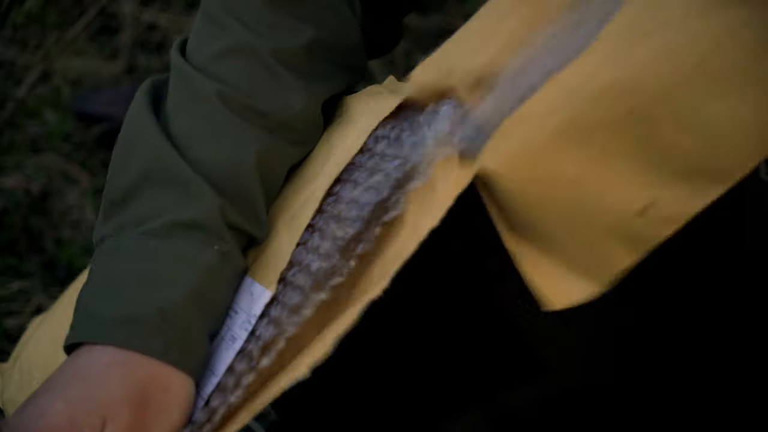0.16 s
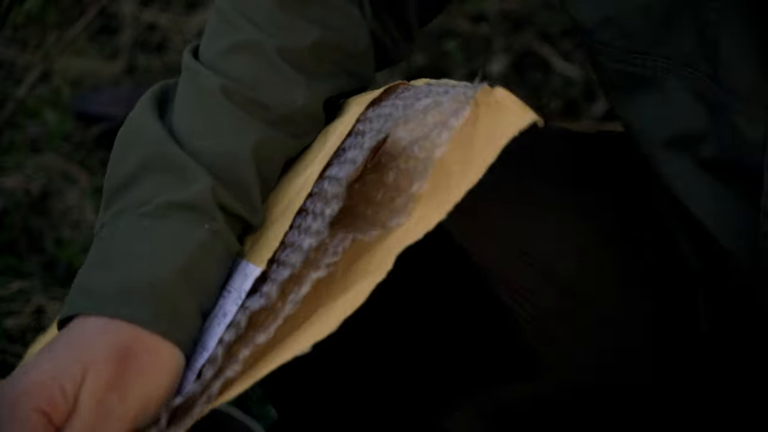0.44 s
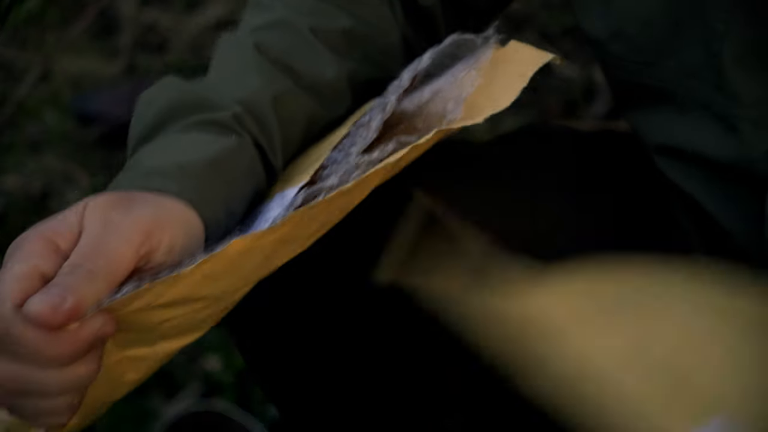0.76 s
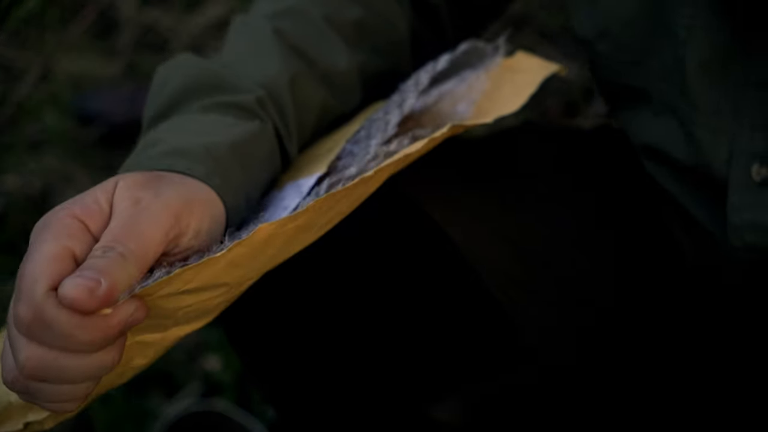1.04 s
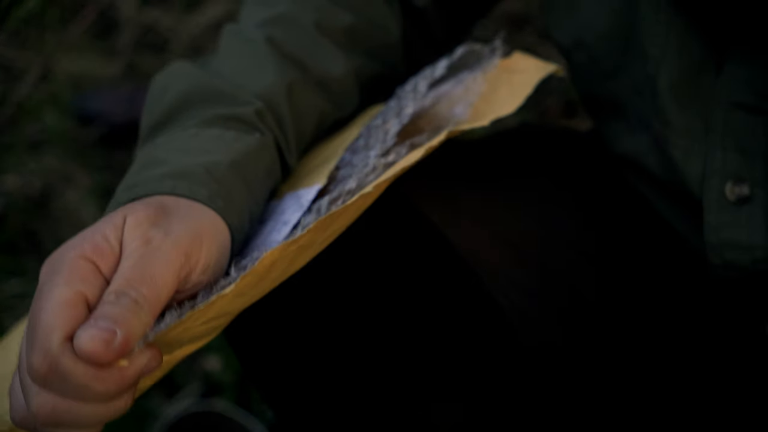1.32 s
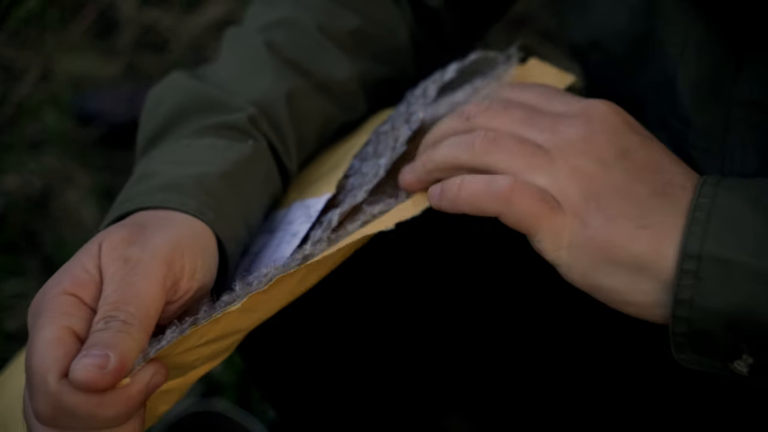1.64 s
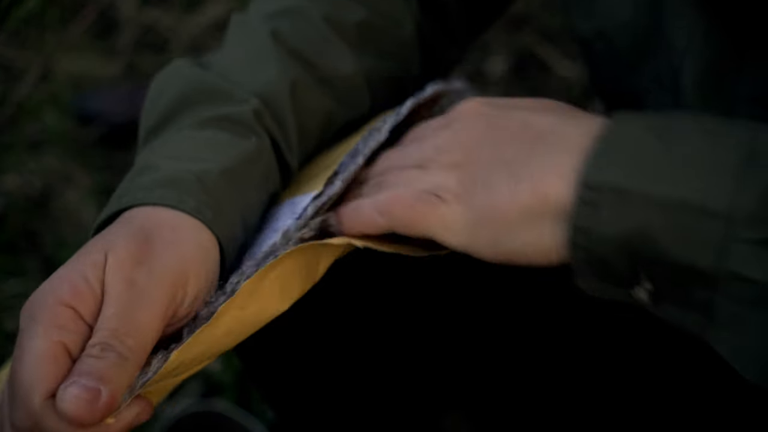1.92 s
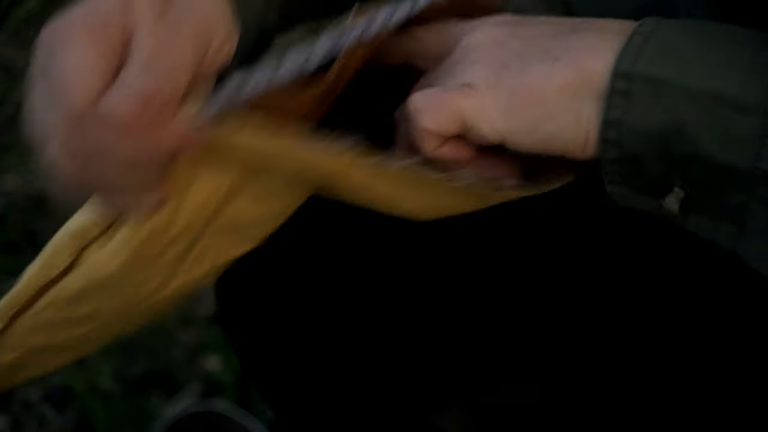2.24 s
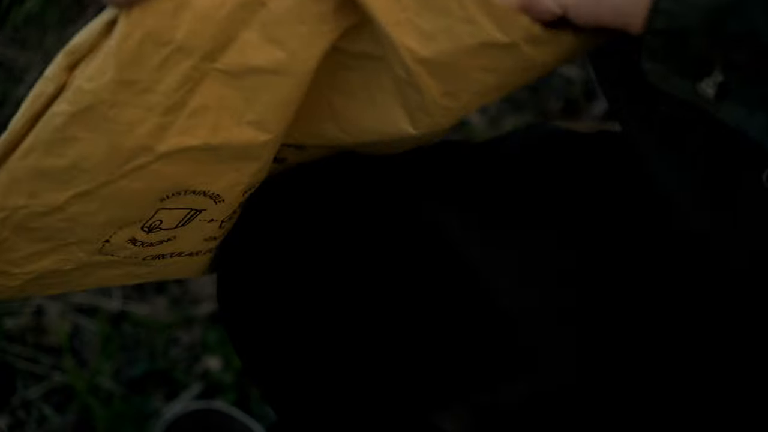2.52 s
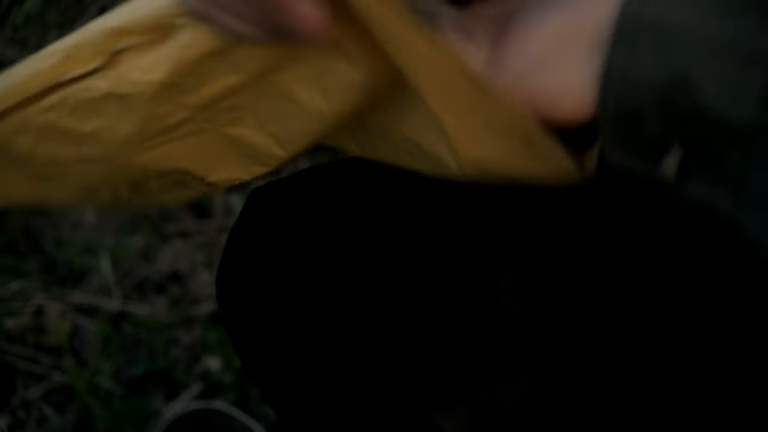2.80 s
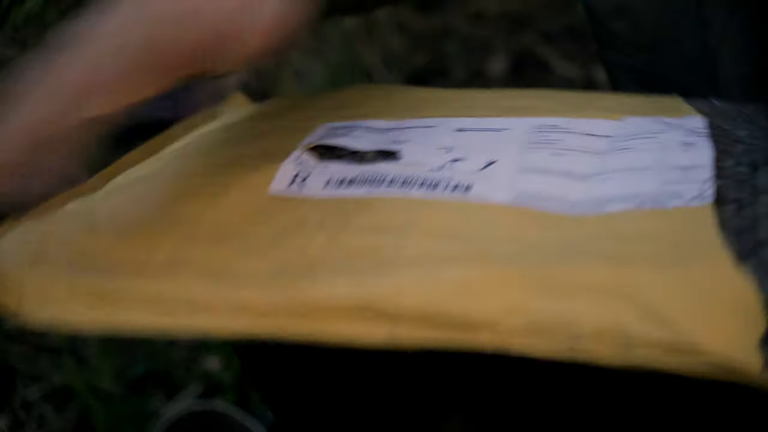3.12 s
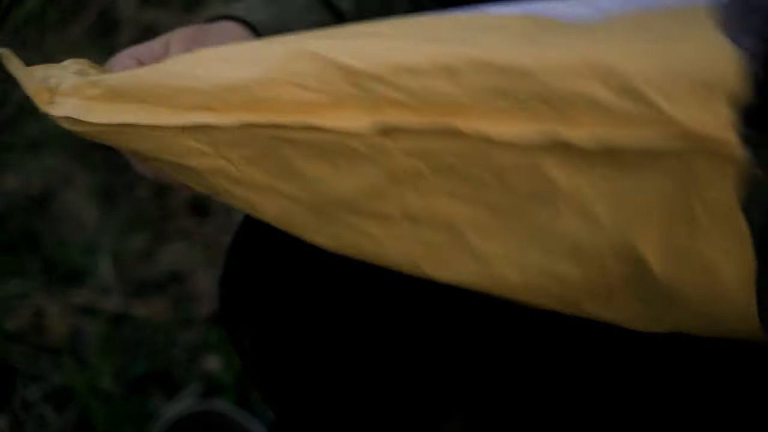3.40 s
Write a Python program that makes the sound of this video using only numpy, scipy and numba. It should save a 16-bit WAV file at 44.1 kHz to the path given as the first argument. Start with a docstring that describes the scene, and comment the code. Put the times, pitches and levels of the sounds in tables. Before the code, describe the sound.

A padded paper envelope is ripped open, then crinkles as it is handled.

```python
"""A padded paper envelope is torn open close by, over a faint outdoor background.
First the fibres part in a dense run of tiny snaps, until the strip comes free with a flap of the sheet.
Then, from about half a second, the envelope is held nearly still and only rustles a little.
From about two seconds a hand opens it, reaches in and turns it over: creases buckle one by one,
the paper crinkles and slides, and the hollow envelope thumps softly."""
import sys
import numpy as np
from scipy import signal
from scipy.fft import rfft, irfft
from scipy.io import wavfile
from scipy.ndimage import uniform_filter1d
from numba import njit

SR = 44100
rng = np.random.default_rng(int(sys.argv[2]) if len(sys.argv) > 2 else 0)


def inscribe(sig):
    """Save sig as 16-bit PCM at rate SR to the path in sys.argv[1].

    A 1-D sig is mono; a 2-D sig holds one channel per row.
    Samples are clipped to [-1, 1] before scaling.
    """
    pcm = np.round(np.clip(np.atleast_2d(sig).T, -1, 1) * 32767)
    wavfile.write(sys.argv[1], SR, pcm.astype(np.int16))


N = 156555
MIDDLE_HZ, TREBLE_HZ, TOP_HZ = 500, 3300, 15400
RING_SLOPE = 0.3  # how much sooner high-pitched spots of paper stop ringing


def undb(db):
    """Turn decibels into a gain."""
    return 10 ** (np.asarray(db) / 20)


def unit(x):
    """Scale a sound to an average (rms) level of 1."""
    return x / np.sqrt(np.mean(x ** 2) + 1e-20)


def band(x, edges, kind, order=2):
    """Keep only the low, high or in-between frequencies."""
    return signal.sosfilt(signal.butter(order, edges, kind, fs=SR, output="sos"), x)


def response(points):
    """Build a short click (an impulse response) whose tone follows (frequency_hz, level_db) points."""
    hz, db = np.array(points, float).T
    grid_hz = np.maximum(np.fft.rfftfreq(4096, 1 / SR), 1)
    gain = undb(np.interp(np.log(grid_hz), np.log(np.sort(hz)), db))
    cepstrum = irfft(np.log(gain))
    half = len(cepstrum) // 2
    fold = np.r_[1, np.full(half - 1, 2), 1, np.zeros(half - 1)]  # moves the energy to the click's start
    return irfft(np.exp(rfft(cepstrum * fold)))[:half]


def colour(x, taps):
    """Give a sound the tone of an impulse response."""
    return signal.fftconvolve(x, taps)[:len(x)]


def add(out, start_s, sound):
    """Mix a short sound in at a given time."""
    i = max(int(start_s * SR), 0)
    out[i:i + len(sound)] += sound[:max(N - i, 0)]


def outdoor_air():
    """A faint, steady, low rush of outdoor noise."""
    # tone of the background: frequency_hz, level_db
    air_tone = [(30, -29.5), (70, -4.5), (340, 1), (600, -7), (1500, -10), (4000, -27.5), (15000, -39)]
    return undb(-58.5) * unit(colour(rng.standard_normal(N), response(air_tone)))


def sheet_flaps():
    """Flapped or bumped, the padded sheet swings for a few cycles and gives a soft thump."""
    # each flap or bump: start_s, level_db, pitch_hz
    flaps = [(0.466, -14, 288), (0.54, -13, 162), (0.9725, -38, 310), (1.698, -33.5, 240),
             (1.792, -28, 397), (2.334, -25, 172), (2.383, -21, 266), (2.556, -23.5, 279),
             (2.833, -33, 202), (3.02, -27, 165), (3.051, -17.5, 335), (3.414, -18, 406)]
    # the ways the sheet vibrates: pitch_ratio, level_db
    modes = [(.66, -9.5), (1.02, 1), (1.88, -3.5), (2.35, -9), (3.2, -7.5), (4.6, -2.5)]
    fade_cycles, rise_s = 1.44, 0.0018
    out, t = np.zeros(N), np.arange(4096) / SR
    for start_s, level_db, pitch_hz in flaps:
        swing = np.zeros(len(t))
        for ratio, mode_db in modes:
            fade = np.exp(-t * pitch_hz * np.sqrt(ratio) / fade_cycles)
            swing += undb(mode_db) * np.sin(2 * np.pi * pitch_hz * ratio * t) * fade
        add(out, start_s, undb(level_db) * swing * (1 - np.exp(-t / rise_s)))
    return out


def crease_snaps():
    """A crease gives way: a crack spreads, the paper beside it rings, and the sheet answers low."""
    # each snapping crease: start_s, relative_level_db, pitch_hz, brightness_db_per_octave
    snaps = [(0.0756, -21, 2670, -0.5), (0.107, -17.5, 6140, -0.5), (0.114, -18, 5700, -2.5),
             (0.2013, -23, 6250, 6), (0.335, -19, 3470, 1), (0.3493, -17.5, 2730, -1),
             (0.3766, -22, 2200, 3.5), (0.463, -20.5, 2140, -1.5), (0.5016, -25.5, 1720, -7),
             (0.5182, -30.5, 1930, -8), (0.5396, -26.5, 795, -9), (0.6136, -35.5, 2660, -2.5),
             (0.6404, -30, 1004, -4.5), (0.825, -38.5, 1420, -1.5), (0.9747, -31.5, 3580, -4),
             (0.9794, -35.5, 1350, -3), (1.073, -38.5, 1230, -10), (1.0923, -44, 1420, -4),
             (0.8521, -41.5, 2130, 2.5), (1.7818, -38, 6640, 0.5), (1.8055, -37.5, 3100, 3),
             (1.8161, -34.5, 6600, -2), (1.8733, -32, 3000, 0.5), (1.9135, -40, 2600, -3),
             (1.9465, -32, 2590, -3.5), (1.9708, -27, 820, 1), (2.0425, -26.5, 1640, -3),
             (2.0811, -28.5, 2940, 4), (2.091, -31, 2720, -3.5), (2.114, -26.5, 1500, 6.5),
             (2.1422, -21, 2580, 4), (2.156, -22, 6900, 0.5), (2.1645, -23, 3700, 5),
             (2.1829, -23.5, 2700, -0.5), (2.2459, -21.5, 3880, -1.5), (2.3638, -29.5, 3670, 1),
             (2.4183, -21.5, 4960, 2), (2.5874, -29, 3360, -1.5), (2.63, -35, 1580, -5.5),
             (2.7928, -32, 4800, 1), (2.809, -22, 1780, 1.5), (2.8453, -20, 6220, 5),
             (2.9017, -28, 2540, 2), (2.9147, -23.5, 6070, 5), (2.922, -17, 3020, 1),
             (2.9623, -19.5, 3070, 2), (2.9897, -18, 3570, 0), (2.998, -23, 1620, -1),
             (3.0467, -18, 3260, 1.5), (3.0551, -19, 3460, 3), (3.0759, -20, 4970, 1),
             (3.1239, -14.5, 6850, 4), (3.1623, -23.5, 1520, 0.5), (3.2454, -25.5, 2300, -1.5),
             (3.2633, -26.5, 1550, -4.5), (3.3451, -25, 2500, -1), (3.4132, -19, 750, -4),
             (3.4601, -17.5, 1520, -5.5), (3.4702, -20.5, 776, 1), (3.4862, -17, 1050, -2),
             (3.5234, -22.5, 2160, -1)]
    # tone of a crack before its brightness tilts it: frequency_hz, level_db
    crack_tone = [(100, -8.5), (500, -1.5), (1500, 1.5), (4000, 0.5), (6700, -1.5), (8500, -10.5),
                  (11000, -22.5), (15500, -52)]
    centre_hz = 3000
    out, t = np.zeros(N), np.arange(2048) / SR
    burst = lambda peak_s: t / peak_s * np.exp(-.5 * (t / peak_s) ** 2)
    fade = lambda decay_s: np.minimum(t / .0007, 1) * np.exp(-t / decay_s)
    gain = np.sqrt(.005 / t[-1])  # a snap holds the energy of about 5 ms at its level
    for start_s, level_db, pitch_hz, brightness in snaps:
        taps = response([(hz, db + brightness * np.log2(max(hz, MIDDLE_HZ) / centre_hz))
                         for hz, db in crack_tone])
        noise = rng.standard_normal((3, len(t)))
        crack = unit(colour(noise[0] * burst(peak_s=0.001), taps))
        spread = unit(colour(noise[1] * fade(decay_s=0.003), taps))
        ring_peak_s = 0.0014 * (pitch_hz / centre_hz) ** -RING_SLOPE
        ring = unit(np.sin(2 * np.pi * pitch_hz * t) * burst(ring_peak_s))
        body = unit(band(noise[2] * fade(decay_s=0.008), (155, 1010), "band"))
        body_db = -10.5 - 0.51 * brightness  # dull snaps have more body
        snap = undb(-2.5) * crack + undb(-9.5) * spread + undb(-5.5) * ring + undb(body_db) * body
        add(out, start_s, snap * undb(level_db) * gain)
    return out


@njit
def ringing_spots(start_s, pitch_hz, decay_s, size, length):
    """Each jolted spot of paper rings as one quickly fading sine wave."""
    out = np.zeros(length)
    for k in range(len(start_s)):
        wave = size[k] + 0j
        step = np.exp((2j * np.pi * pitch_hz[k] - 1 / decay_s[k]) / SR)  # turns and shrinks the wave
        first = int(start_s[k] * SR)
        for i in range(first, min(first + int(6 * decay_s[k] * SR), length)):
            wave *= step
            out[i] += wave.imag
    return out


def crackle(start_s, end_s, per_second, spread_db, spots=8):
    """Tiny buckles at random moments, mostly weak, a few strong; each rings several spots of paper."""
    span_s = end_s - start_s
    buckle_rng = np.random.default_rng(rng.integers(2 ** 31))
    draws = buckle_rng.random((int(span_s * per_second) + 1, 2 + 3 * spots))  # one row per buckle
    when, weakness = draws[:, :1], draws[:, 1:2]
    place, side, lag = np.hsplit(draws[:, 2:], 3)
    pitch_hz = 90 + TOP_HZ * place ** 2
    decay_s = 0.002 * (pitch_hz / 1000) ** -RING_SLOPE
    balance = np.sqrt(np.sqrt(pitch_hz) / decay_s)  # evens out the energy from low to high
    size = undb(-spread_db * np.log(.04 + weakness)) * np.sign(side - .5) * balance
    onset_s = start_s + when * span_s + lag * .0015  # a buckle reaches all its spots within 1.5 ms
    rings = ringing_spots(onset_s.ravel(), pitch_hz.ravel(), decay_s.ravel(), size.ravel(), N)
    return unit(rings) * np.sqrt(span_s * SR / N)


def paper(levels, tone, per_second, spread_db, rub_db, middle_offset_db, treble_offset_db):
    """Paper crackles and rubs; middle and treble each follow their own level curve plus an offset."""
    times, middle_db, treble_db = np.array(levels, float).T
    t = np.arange(N) / SR
    active = (t >= times[0]) & (t <= times[-1])
    buckles = crackle(times[0], times[-1], per_second, spread_db)
    rubbing = undb(rub_db) * rng.standard_normal(N)
    sound = colour(buckles + rubbing, response(tone))
    low = signal.sosfiltfilt(signal.butter(4, TREBLE_HZ, fs=SR, output="sos"), sound)
    high = sound - low
    middle = band(low, MIDDLE_HZ, "high", order=4)  # the bass rises and falls with the middle
    low *= undb(np.interp(t, times, middle_db) + middle_offset_db) / middle[active].std()
    high *= undb(np.interp(t, times, treble_db) + treble_offset_db) / high[active].std()
    soft_gate = uniform_filter1d(active * 1., size=200)
    return (low + high) * soft_gate


def holding():
    """Held nearly still, the envelope rubs quietly and crackles a little."""
    # loudness of the rustle: time_s, middle_db, treble_db
    hold_levels = [(0.48, -39.5, -48), (0.505, -41, -51), (0.55, -37.5, -37.5), (0.57, -49.5, -52.5),
                   (0.63, -43, -48), (0.745, -47.5, -48), (0.775, -50.5, -54), (1.055, -54, -59.5),
                   (1.085, -51, -54), (1.14, -53.5, -59.5), (1.39, -67, -71), (1.415, -46.5, -54.5),
                   (1.5, -58.5, -63.5), (1.675, -61.5, -64), (1.695, -48, -47), (1.755, -63, -54.5),
                   (1.79, -45.5, -45), (1.85, -60, -47.5), (1.93, -51, -48.5)]
    # tone of the held paper: frequency_hz, level_db
    hold_tone = [(35, -38), (64, -6), (117, -10), (202, -9.5), (577, -4), (1310, -8), (6320, -4.5),
                 (15500, -34)]
    return paper(hold_levels, hold_tone, per_second=290, spread_db=3.5, rub_db=1.5,
                 middle_offset_db=-1.5, treble_offset_db=-3.0)


def turning_over():
    """The paper crinkles and slides as a hand opens the envelope and turns it over."""
    # loudness of the handling: time_s, middle_db, treble_db
    turn_levels = [(1.93, -55, -49), (1.985, -45.5, -39.5), (2.025, -32.5, -30), (2.065, -46, -46.5),
                   (2.125, -45, -46.5), (2.15, -31, -34), (2.22, -37, -38.5), (2.28, -43.5, -36.5),
                   (2.305, -30.5, -30.5), (2.335, -24, -26.5), (2.36, -42.5, -46.5), (2.385, -32.5, -33),
                   (2.465, -43.5, -46), (2.487, -36.5, -27.5), (2.565, -41.5, -43.5), (2.615, -49, -54.5),
                   (2.665, -47, -41.5), (2.8, -50, -50), (2.828, -29.5, -31.5), (2.905, -38, -33.5),
                   (2.98, -27.5, -27.5), (3.04, -29.5, -31.5), (3.11, -33, -35.5), (3.15, -32, -32),
                   (3.23, -38, -44), (3.31, -37, -47.5), (3.4, -31.5, -36.5), (3.435, -22, -28.5),
                   (3.505, -27.5, -37.5), (3.55, -30.5, -35)]
    # tone of the crinkling paper: frequency_hz, level_db
    turn_tone = [(35, -39), (75, -19.5), (154, -5), (235, -6.5), (410, 2), (1250, -5.5), (1520, -2),
                 (2160, -6.5), (3390, -2.5), (7100, -2), (13000, -28.5), (15500, -51)]
    return paper(turn_levels, turn_tone, per_second=520, spread_db=2.0, rub_db=-4.0,
                 middle_offset_db=0.5, treble_offset_db=-1.5)


def tearing():
    """Fibres part in a dense run of tiny snaps as the strip is torn off."""
    # loudness of the rip: time_s, middle_db, treble_db
    tear_levels = [(0, -24, -31), (0.11, -23.5, -21.5), (0.145, -25, -28.5), (0.235, -22, -29),
                   (0.28, -25.5, -22), (0.37, -29, -33.5), (0.462, -33.5, -34.5), (0.478, -33, -49)]
    # tone of the tearing paper: frequency_hz, level_db
    tear_tone = [(35, -36), (75, -7.5), (174, -2), (740, -1.5), (1130, -4.5), (1520, -2), (2450, -7.5),
                 (2840, -5.5), (6160, -5.5), (9180, -18), (15500, -47.5)]
    return paper(tear_levels, tear_tone, per_second=1600, spread_db=2.5, rub_db=-8,
                 middle_offset_db=-0.7, treble_offset_db=-0.47)


def scene():
    """The rip, the lull and the handling, with snaps, flaps and the background, in one channel."""
    return (tearing() + holding() + turning_over() + crease_snaps() + sheet_flaps() + outdoor_air())[None]


def record(dry):
    """Thin the deep bass, round off the highest peaks and cut the very top of the treble."""
    ceiling = .66
    rounded = ceiling * np.tanh(band(dry, 84, "high") / ceiling)
    return signal.sosfilt(signal.ellip(8, .2, 70, TOP_HZ, fs=SR, output="sos"), rounded)


dry = scene()
out = record(dry)
inscribe(out)
```